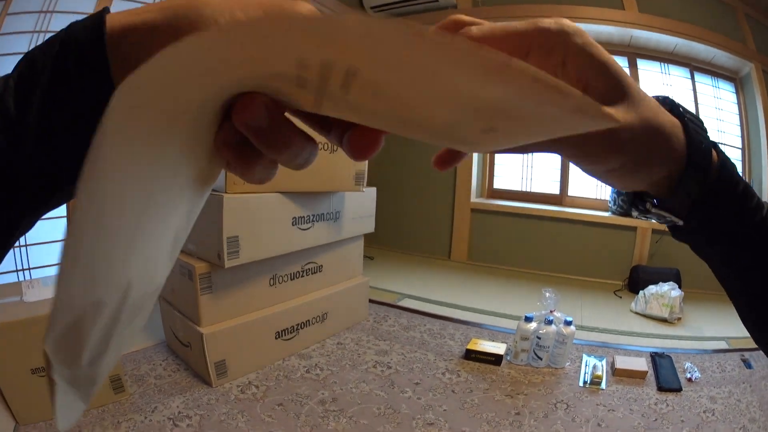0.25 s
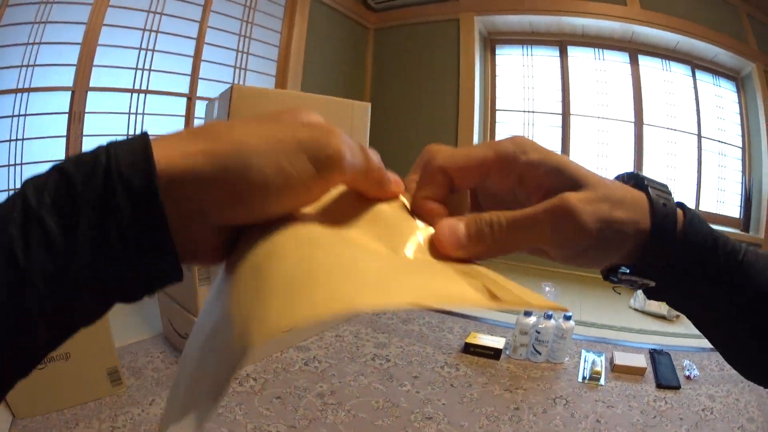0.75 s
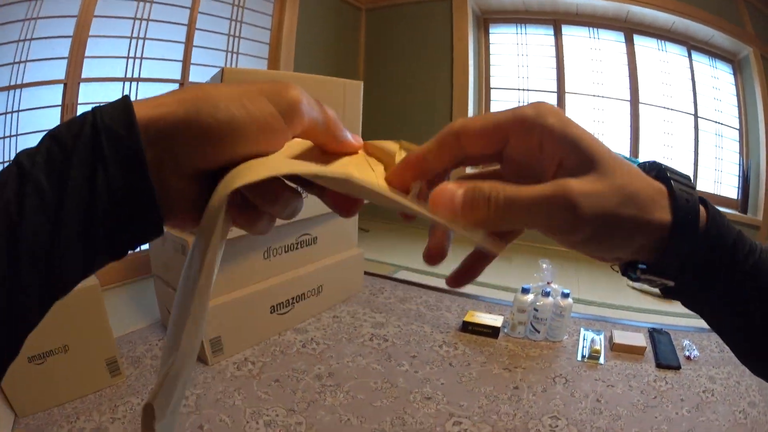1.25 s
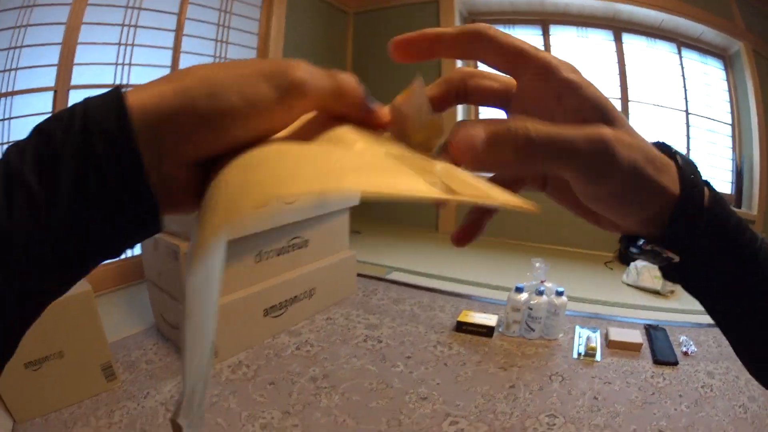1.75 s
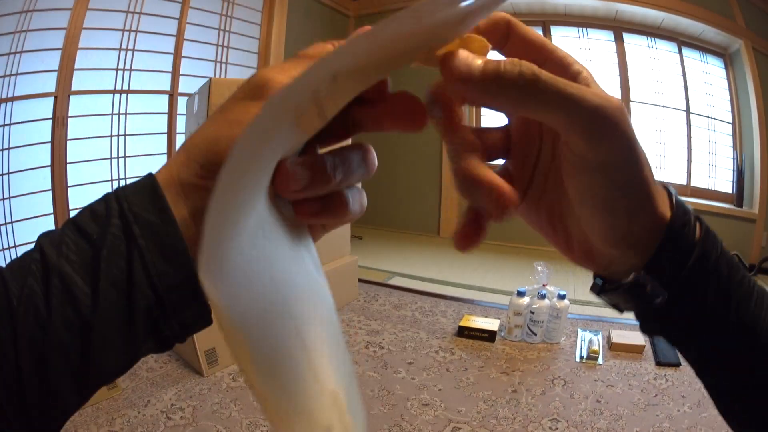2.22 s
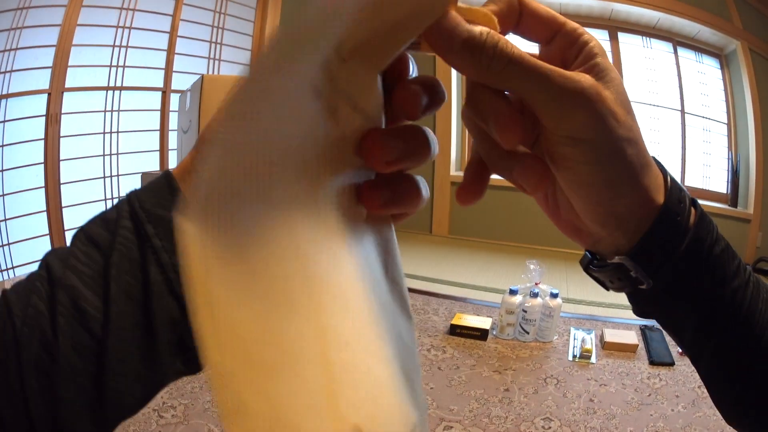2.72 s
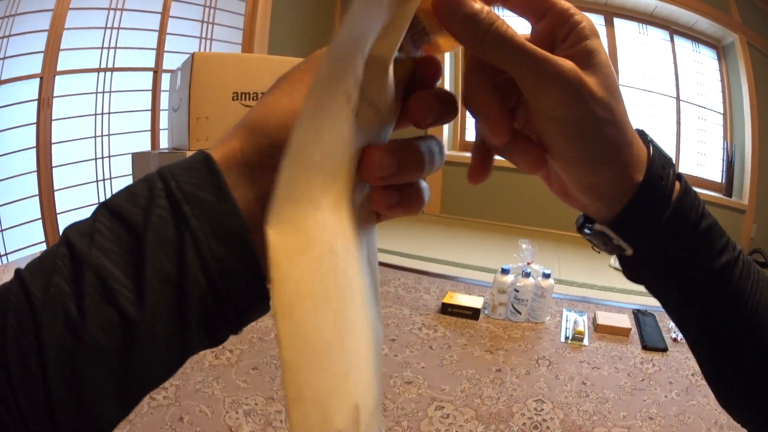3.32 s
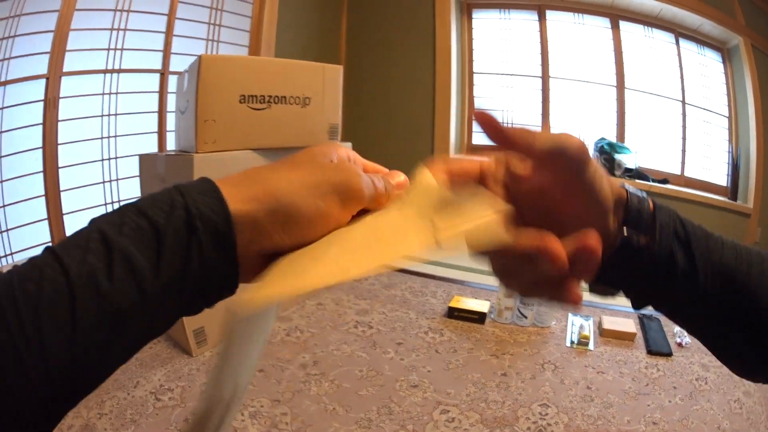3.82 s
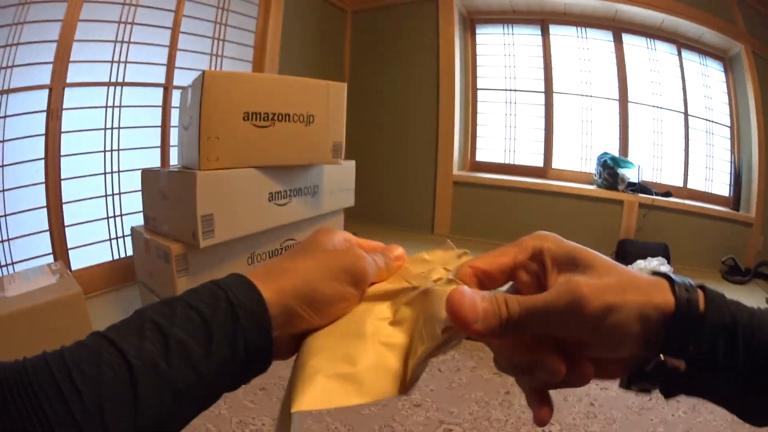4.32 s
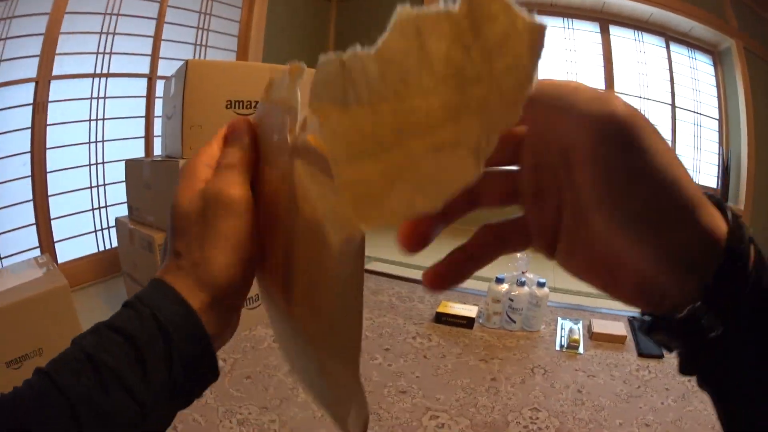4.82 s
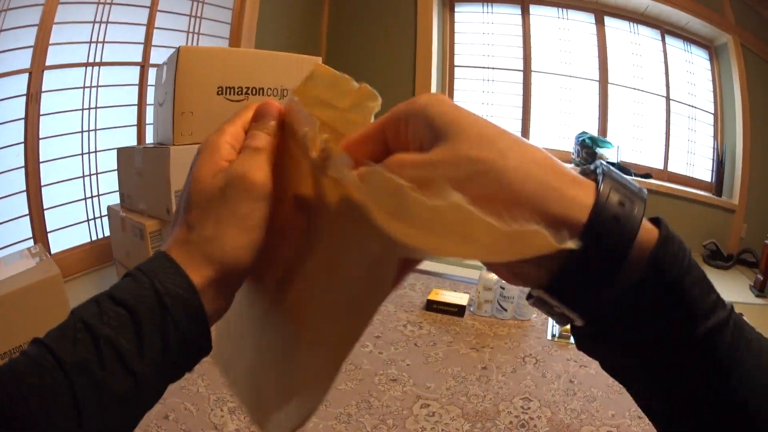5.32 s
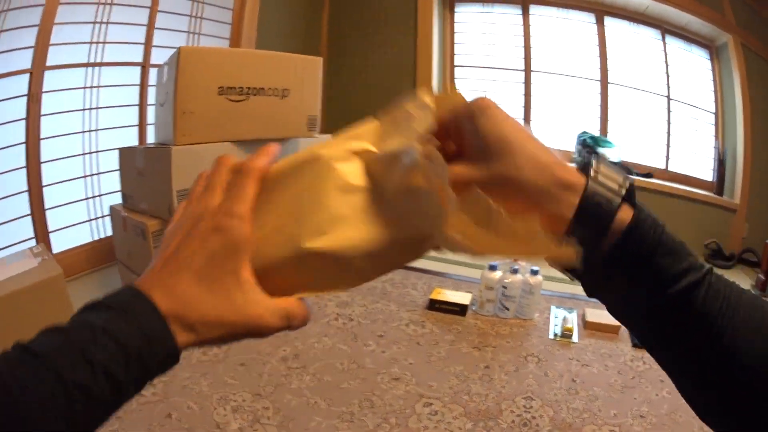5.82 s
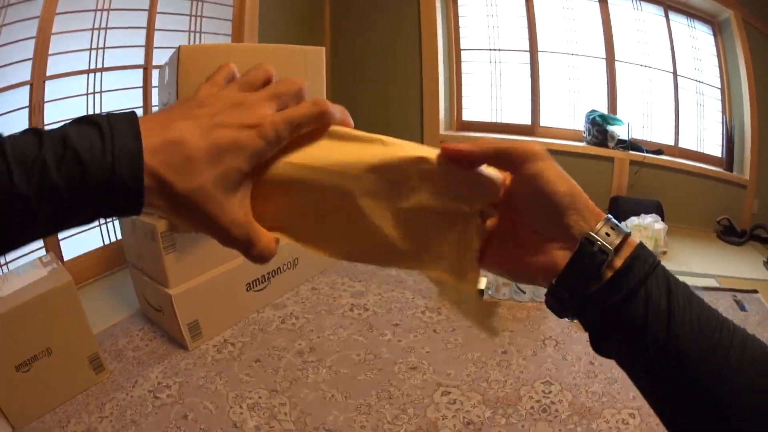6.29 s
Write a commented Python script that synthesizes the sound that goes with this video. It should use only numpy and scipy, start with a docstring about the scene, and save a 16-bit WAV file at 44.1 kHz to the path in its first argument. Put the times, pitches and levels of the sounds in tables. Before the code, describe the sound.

A stiff paper mailer is picked at, torn and crumpled close by, with sharp snaps, dry crackle and hollow rustling in a quiet room.

```python
"""Sharp snaps and a burst of crackle, then a kraft paper mailer picked at, torn open and crumpled close by.
Buckling creases are short noise bursts through resonances; crackle and knocks are random trains of wavelets.
Rubbing is patchy filtered noise, thuds are dying low sines; the hollow pouch rings as a set of resonances.
Hand strokes set the levels. A small quiet room adds a short tail and a hush, the moving sheet a deep rumble."""
import sys
import numpy as np
from scipy import signal
from scipy.fft import rfft, irfft
from scipy.io import wavfile
from scipy.ndimage import uniform_filter1d, map_coordinates

SR = 44100
rng = np.random.default_rng(int(sys.argv[2]) if len(sys.argv) > 2 else 0)


def voltage_ratio(level):
    """Linear amplitude factor for a level in decibels (scalar or array-like)."""
    return 10 ** (np.asarray(level, float) / 20)


def transcribe(u):
    """Save the signal u as a 16-bit wav file named by the first command-line argument.

    u: samples, shape (n,) or (channels, n), limited to [-1, 1]; the rate is SR.
    q: integer samples, one column per channel.
    """
    v = np.clip(np.atleast_2d(u).T, -1, 1)
    q = np.round(v * 32767).astype(np.int16)
    wavfile.write(sys.argv[1], SR, q)


N = 288855  # samples

# Quiet room, relative spectrum: (frequency [Hz], density [dB per Hz])
AIR_SPECTRUM = [(15, -62), (25, -32), (412, 11), (798, 24), (1630, 5), (4510, -5), (6960, 10), (11000, -2),
                (14300, -70)]
# Decay of the room: (frequency [Hz], t60 [s])
ROOM_T60 = [(200, 0.12), (1000, 0.33), (4000, 0.13), (10000, 0.12)]
# Phase lead of the left microphone port over the right: (frequency [Hz], lead [rad])
PORT_LEAD = [(0, 0.019), (1030, 0.49), (5940, 0.38), (11900, -0.89)]
# Left port level over right: (frequency [Hz], difference [dB])
PORT_BALANCE = [(60, -3), (170, -3.5), (490, -3.5), (1420, -0.5), (4080, 2), (11700, 1)]
# Flexing sheet, relative spectrum: (frequency [Hz], density [dB per Hz])
FLEX_SPECTRUM = [(24, -42), (40, -33), (151, -36), (305, 0), (556, 7), (740, -17.5), (900, -0.5),
                 (1170, 13.5), (1980, -120)]
# Rubbing paper, relative spectrum: (frequency [Hz], density [dB per Hz])
PAPER_SPECTRUM = [(410, -11.5), (700, -6.5), (1520, -2.5), (1840, -2), (4230, 0), (7700, -9.5), (9040, -19),
                  (11000, -14), (14300, -67)]
# Whole sheet pops in or out: (time [s], level [dB re amplitude 2], frequency [Hz])
THUDS = [(0.176, -34, 240), (0.667, -42, 150), (1.511, -43, 85), (2.0, -28, 230), (2.727, -35, 380),
         (3.986, -25.5, 470), (4.352, -22.5, 330), (4.412, -17.5, 490), (4.911, -32, 320),
         (5.424, -33, 170), (6.216, -27.5, 422), (6.306, -41, 60)]
# Walls of the mailer, drumming at any grip: (frequency [Hz], width [Hz], gain [dB])
WALL_MODE = (355, 238, 8.8)
# Air in the mailer, before hollowness is added: (frequency [Hz], width [Hz], gain [dB])
AIR_MODES = [(1450, 380, -0.8), (2860, 275, -9.5), (4240, 530, -6.5), (7410, 930, 1.5)]
# State of the mailer: (time [s], grain of the rustle [0-1], hollowness [dB],
# crumpling between strokes [dB], brightness of a stroke's peak [dB])
GRIP = [(0, 0.8, -8, -66, 2), (.9, 0.61, 4, -64, 1), (1.5, 0.7, 0, -51, -0.5),
        (2.25, 0.8, -3.5, -46.5, -2.5), (2.47, 0.61, -11, -51, -3), (3.03, 0.78, -1, -73, -2.5),
        (3.5, 0.64, 0.5, -79, -4.5), (4.3, 0.69, 2, -47, 2.5), (4.45, 0.9, 5, -50, -4),
        (4.52, 0.27, -1, -66, -7.5), (4.85, 0, -5, -45, -3), (4.92, 0.62, 5.5, -60, 0),
        (5.45, 0.74, -1.5, -41, -1), (5.75, 0.5, 1.5, -61, -4.5), (6.55, 0.75, 5, -59, -12.5)]
# Pulls and squeezes of the hands: (peak time [s], crumpling [dB], rise over 20 dB [ms],
# fall over 20 dB [ms], flap of the whole sheet [dB])
STROKES = [(0.012, -25.5, 51, 155, -37), (0.179, -36.5, 79, 148, -38.5), (0.367, -39, 350, 204, -43),
           (0.497, -34, 26, 151, -44), (0.671, -38.5, 71, 250, -37), (0.743, -35, 195, 163, -50),
           (0.874, -31, 12, 200, -56), (0.899, -23.5, 25, 70, -42), (0.989, -21.5, 18, 71, -53),
           (1.071, -34.5, 118, 139, -34.5), (1.173, -39.5, 57, 800, -48), (1.434, -20, 16, 14, -60),
           (1.467, -20, 65, 71, -37), (1.503, -25, 22, 50, -44), (1.648, -34, 105, 140, -31.5),
           (1.821, -29, 134, 37, -40), (2.014, -12.5, 17.5, 15, -26.5), (2.04, -35, 152, 190, -51),
           (2.175, -33.5, 143, 10, -44), (2.215, -37, 13, 120, -52), (2.298, -37, 11, 104, -58),
           (2.384, -40, 150, 120, -43), (2.584, -37, 50, 95, -61), (2.697, -43, 17, 200, -58),
           (2.829, -35, 243, 32, -38), (2.862, -32, 8, 98, -54), (3.069, -39, 4, 135, -53),
           (3.125, -38.5, 136, 25, -56), (3.207, -35.5, 29, 125, -63), (3.325, -30, 90, 35, -37.5),
           (3.492, -27, 0, 155, -61), (3.553, -26, 114, 25, -33), (3.6, -38, 69, 403, -61),
           (3.79, -39.5, 664, 100, -44), (3.818, -37, 19, 300, -57), (3.876, -24, 164, 77, -39),
           (3.93, -25, 120, 36, -39), (3.993, -29, 68, 175, -29), (4.122, -20, 29, 117, -26),
           (4.275, -24, 34, 39, -41), (4.35, -20.5, 31, 294, -37), (4.446, -18, 113, 201, -25.5),
           (4.912, -36, 2, 195, -45), (4.937, -37, 32, 141, -36.5), (5.011, -39.5, 47, 200, -39),
           (5.162, -32, 180, 105, -38.5), (5.277, -32, 32, 200, -38.5), (5.37, -27.5, 82, 198, -29.5),
           (5.429, -33.5, 120, 99, -28.5), (5.51, -32, 25, 246, -34), (5.588, -40, 150, 150, -30),
           (5.685, -30.5, 48, 55, -42), (5.766, -19.5, 49, 168, -24.5), (5.94, -23.5, 116, 120, -26.5),
           (5.998, -25.5, 90, 129, -33), (6.066, -29.5, 54, 87, -35), (6.194, -32.5, 53, 500, -38),
           (6.311, -22, 29, 200, -38), (6.345, -19, 57, 155, -44), (6.44, -23, 69, 200, -36),
           (6.515, -25, 120, 150, -32.5)]
# Creases that buckle: (time [s], level [dB], centre [Hz], length [ms])
SNAPS = [(0.025, -14.5, 4400, 1.3), (0.045, -20, 4300, 6.3), (0.0583, -20.5, 4020, 1.3),
         (0.0694, -27, 3950, 5.8), (0.172, -18, 4500, 1.26), (0.218, -32, 5570, 0.76),
         (0.245, -24, 6200, 1.2), (0.2994, -14, 5000, 1.2), (0.336, -28, 5410, 1.1),
         (0.3649, -24, 2820, 1.7), (0.499, -30, 5260, 1.7), (0.5945, -36.5, 2960, 2.9),
         (0.6668, -13.5, 3430, 0.26), (0.745, -23.5, 3600, 1.6), (0.7675, -27, 6400, 1.7),
         (0.834, -32.5, 4450, 0.91), (0.8928, -18.5, 3300, 1.9), (0.9072, -18.5, 4170, 1.4),
         (1.0674, -13, 3300, 0.47), (1.088, -28, 3500, 1.2), (1.1045, -25, 3820, 0.85),
         (1.3178, -21, 4700, 0.53), (1.3258, -30, 5130, 0.7), (1.379, -32.5, 2050, 2.7),
         (1.4295, -22, 1250, 3), (1.4335, -20, 1300, 2), (1.4375, -18, 4000, 2), (1.4522, -17, 3200, 1.2),
         (1.5159, -21, 2050, 0.81), (1.6106, -27.5, 3400, 1.2), (1.617, -32, 4500, 1.5),
         (1.6309, -30.5, 4670, 3), (1.6415, -23, 7700, 4), (1.6495, -15, 3880, 1.6),
         (1.7096, -19, 1500, 0.8), (1.7919, -31, 1120, 5), (1.851, -32, 2690, 2.9),
         (1.9381, -15.5, 4200, 1), (1.9758, -14, 2220, 0.18), (1.9964, -18, 4920, 0.98),
         (2.0015, -15, 2700, 0.44), (2.0047, -19, 2530, 2.8), (2.092, -17, 3120, 0.67),
         (2.2091, -22, 2670, 1.7), (2.384, -25, 2820, 2.1), (2.4584, -37.5, 4250, 0.89),
         (2.5717, -35, 2830, 0.9), (2.6134, -31, 1930, 2), (2.696, -32, 2600, 1), (2.738, -33.5, 3050, 1.4),
         (2.9288, -23, 2830, 0.36), (2.944, -26.5, 3020, 1.16), (3.071, -34, 1460, 2.4),
         (3.0822, -32, 1900, 3.2), (3.179, -39.5, 2980, 1.4), (3.238, -39, 3000, 0.8),
         (3.3186, -33, 2630, 8.8), (3.3645, -29.5, 3200, 1.9), (3.4896, -30.5, 3400, 2.5),
         (3.499, -23, 1130, 1.8), (3.595, -29.5, 4360, 1.2), (3.646, -27, 2400, 0.65),
         (3.797, -32, 3830, 0.79), (3.814, -20.5, 1670, 2.2), (3.8287, -23, 4080, 1.2),
         (3.8655, -27, 6560, 3), (3.8772, -15.5, 3570, 1.6), (3.8874, -16.5, 3000, 1.4),
         (3.9225, -28, 4870, 3), (3.939, -17, 2300, 5.2), (3.977, -30, 4130, 0.8), (3.9881, -29, 1710, 1.8),
         (4.0487, -15, 3600, 1.04), (4.1076, -24, 4550, 3.9), (4.119, -16, 3900, 2.6),
         (4.132, -20, 3000, 1.5), (4.139, -11, 3560, 1.24), (4.145, -19, 2780, 3),
         (4.269, -22.5, 6260, 0.92), (4.2755, -22.5, 5300, 0.68), (4.292, -28, 4300, 1.9),
         (4.3292, -24, 5000, 0.7), (4.338, -21.5, 4300, 3.4), (4.3516, -17.5, 3130, 1.9),
         (4.36, -17, 3020, 0.84), (4.373, -23, 5800, 2.9), (4.3786, -14, 3840, 0.89),
         (4.3843, -19, 5260, 4.3), (4.3922, -21, 5170, 6), (4.4078, -15.5, 3730, 2.3),
         (4.413, -12, 3440, 0.3), (4.428, -17, 3930, 0.99), (4.4355, -16, 3450, 0.73),
         (4.441, -22, 3040, 4.1), (4.491, -23, 5000, 1.4), (4.7022, -31, 2580, 4.8),
         (4.771, -17, 4700, 1.3), (4.8123, -26.5, 3500, 1.2), (5.0081, -17.5, 2460, 0.86),
         (5.02, -27, 1800, 1.3), (5.0435, -24, 2120, 2.9), (5.07, -20.5, 2900, 1.3),
         (5.155, -24.5, 4830, 1.8), (5.236, -34, 2630, 2.4), (5.336, -29, 1500, 1), (5.367, -24, 1200, 2.8),
         (5.3767, -23.5, 1570, 1.3), (5.3825, -17.5, 1290, 0.43), (5.4247, -12, 1910, 0.47),
         (5.4321, -12.5, 2820, 2), (5.44, -21, 2960, 1.6), (5.4475, -24, 2300, 2),
         (5.506, -22.5, 3150, 2.3), (5.5195, -20, 3600, 1.6), (5.5734, -22, 2600, 1.9),
         (5.5886, -18.5, 1970, 1.3), (5.6168, -19.5, 3000, 2), (5.7233, -21, 2060, 1.9),
         (5.734, -20, 3660, 2.8), (5.7438, -18, 3600, 1.5), (5.7663, -18, 2620, 3.7),
         (5.773, -17, 1560, 3.3), (5.7802, -17.5, 2600, 1.3), (5.793, -18, 3170, 2.1),
         (5.8027, -19, 1620, 1.4), (5.82, -15, 3330, 0.9), (5.991, -27.5, 1500, 5.4),
         (6.006, -26, 6900, 3.5), (6.016, -18, 3600, 1), (6.066, -25.5, 2420, 2.4), (6.089, -34, 1440, 1.8),
         (6.1889, -25, 2350, 2), (6.1936, -19, 3000, 0.84), (6.2182, -23, 1550, 0.58),
         (6.2443, -13, 3700, 1.25), (6.299, -16.5, 2500, 0.91), (6.3109, -13.5, 4470, 0.49),
         (6.316, -19.5, 2940, 5.2), (6.33, -22, 1500, 4.2), (6.343, -19.5, 2840, 6), (6.37, -19.5, 1450, 2),
         (6.377, -22, 2800, 1.8), (6.4277, -18, 3150, 2.5), (6.4371, -16, 1760, 1.5),
         (6.4542, -19, 3000, 6), (6.4827, -14.5, 2290, 1.5), (6.512, -23.5, 1320, 1.5),
         (6.5177, -16, 3670, 1)]


def evened(x):
    """Scales to rms 1."""
    return x / np.sqrt(np.mean(x ** 2) + 1e-20)


def read(points, hz):
    """Reads a spectrum on a log-frequency axis."""
    f, value = np.transpose(points)
    return np.interp(np.log(hz + 1), np.log(f + 1), value)


def shaped(x, spectrum):
    """Colours a sound by a spectrum, to rms 1."""
    hz = np.fft.rfftfreq(x.shape[-1], 1 / SR)
    return evened(irfft(rfft(x) * voltage_ratio(read(spectrum, hz)), x.shape[-1]))


def wander(seconds):
    """Slow chance of rms 1 that changes over the given time."""
    size = round(seconds * SR)
    return evened(uniform_filter1d(uniform_filter1d(rng.standard_normal(N), size), size))


def add(mix, s, sound):
    """Adds a sound at a time."""
    part = mix[round(s * SR):][:len(sound)]
    part += sound[:len(part)]


def resonate(x, hz, width_hz):
    """A resonance of gain 1 at its centre."""
    return signal.lfilter(*signal.iirpeak(min(hz, 15000), hz / width_hz, SR), x)


def moving_resonance(x, hz, width_hz):
    """A resonance of gain 1 that follows a moving centre: shift to 0 Hz, smooth, shift back."""
    turn = np.exp(2j * np.pi * np.cumsum(hz) / SR)
    r = np.exp(-np.pi * width_hz / SR)
    return 2 * (turn * signal.lfilter([1 - r], [1, -r], x / turn)).real


def grains(pitches_hz, per_s, decay_cycles, spread_db, spectrum):
    """Short dying wavelets, one random train for each pitch, a few large among many small."""
    for hz in pitches_hz:
        size = voltage_ratio(spread_db * np.minimum(rng.exponential(1, N), 2.5))
        size = size * (rng.random(N) < per_s / SR)
        cycles = np.arange(3000) * hz / SR
        grain = np.sin(2 * np.pi * cycles) * np.exp(-cycles / decay_cycles)
        grain *= voltage_ratio(read(spectrum, hz)) * np.sqrt(hz) / np.linalg.norm(grain)
        yield hz, signal.oaconvolve(size * rng.choice([-1, 1], N), grain)[:N]


def grip(column):
    """One slow state of the mailer, sample by sample."""
    table = np.array(GRIP)
    return np.interp(np.arange(N) / SR, table[:, 0], table[:, column])


def strokes_db(peak_db, rise_ms, fall_ms, idle_db):
    """Strokes that each rise to a peak and die away, summed in power over an idle level."""
    t = np.arange(0, N, 64) / SR
    late_ms = 1000 * (t[:, None] - np.array(STROKES)[:, 0])
    under_db = 20 * np.maximum(-late_ms / rise_ms, late_ms / fall_ms)
    power = (voltage_ratio(peak_db - under_db) ** 2).sum(1) + voltage_ratio(idle_db) ** 2
    return np.interp(np.arange(N) / SR, t, 10 * np.log10(power))


def crumpling_db(haste=1.0, idle_offset_db=0.0):
    """Crumpling by the hands; haste speeds up each rise and fall."""
    _, peak_db, rise_ms, fall_ms, _ = np.transpose(STROKES)
    return strokes_db(peak_db, rise_ms / haste, fall_ms / haste, grip(3)[::64] + idle_offset_db)


def flapping_db():
    """Flaps of the whole sheet, all of one shape, over a faint steady level."""
    return strokes_db(np.transpose(STROKES)[4], rise_ms=26, fall_ms=36, idle_db=-53.5)


def brightness_db():
    """Treble over body: the treble of a stroke rises and falls faster than its body."""
    return grip(4) + crumpling_db(haste=1.34, idle_offset_db=-1) - crumpling_db()


def hush():
    """The quiet room's own noise, nearly independent at the two ports."""
    noise = rng.standard_normal((2, N))
    return voltage_ratio(-63.5) * shaped(noise + 0.097 * noise[::-1], AIR_SPECTRUM)


def draughts():
    """Air stirred by the moving sheet puffs against each port on its own: a deep lumpy rumble."""
    lowpass = signal.butter(3, 40, fs=SR, output="sos")
    deep = signal.sosfilt(lowpass, rng.standard_normal((2, N)))
    return voltage_ratio(0.75 * flapping_db() - 23.0 + 4.0 * wander(0.02)) * evened(deep)


def room(x):
    """Sparse reflections of random sign, each band dying at its own speed."""
    at = np.arange(130, SR // 2, 20)
    shape = (2, len(at))
    taps = np.zeros((2, SR // 2 + 20))
    np.put_along_axis(taps, at + rng.integers(0, 20, shape), rng.choice([-1., 1.], shape), 1)
    hz, t, z = signal.stft(taps, SR, nperseg=256)
    decay_db = -60 * t / read(ROOM_T60, hz)[:, None]
    tail = signal.istft(z * voltage_ratio(decay_db), SR, nperseg=256)[1]
    tail = tail + 0.095 * tail[::-1]  # a little of each tail reaches the other port
    return signal.fftconvolve(x[None], tail / np.linalg.norm(tail[0]), axes=1)[:, :N]


def ports(x):
    """Two microphone ports: the left leads slightly except at the top, with less bass and more treble."""
    hz = np.fft.rfftfreq(N, 1 / SR)
    left = voltage_ratio(read(PORT_BALANCE, hz) / 2) * np.exp(0.5j * read(PORT_LEAD, hz))
    pair = irfft(rfft(x) * np.array([left, 1 / left]), N)
    # the sounding spot moves across the sheet: opposite time shifts at the ports
    shift_samples = 0.14 * wander(0.01)
    return np.array([map_coordinates(v, [np.arange(N) + sign * shift_samples], mode="nearest")
                     for v, sign in zip(pair, (1, -1))])


def thuds():
    """A panel pops through and rings for a few low cycles."""
    t, out = np.arange(8000) / SR, np.zeros(N)
    for s, db, hz in THUDS:
        cycles = t * hz
        envelope = 2 * voltage_ratio(db - 60 * cycles / 7.0) * np.minimum(cycles / 0.35, 1)
        add(out, s, envelope * np.sin(2 * np.pi * cycles))
    return out


def flexing():
    """The whole sheet bends and flaps: dull knocks over a low rustle that differs at each port."""
    trains = grains(np.geomspace(90, 950, 18), per_s=50, decay_cycles=1.8, spread_db=4.8,
                    spectrum=FLEX_SPECTRUM)
    knocks = evened(sum(train for _, train in trains))
    rustle = shaped(rng.standard_normal((2, N)), FLEX_SPECTRUM)
    return voltage_ratio(flapping_db() - 2.0) * (knocks + 0.48 * rustle)


def pouch(x):
    """The walls drum low; the air rings higher with hollowness, each ring drifting in pitch and level by chance."""
    air = np.zeros(N)
    for hz, width_hz, db in AIR_MODES:
        moving_hz = hz * np.exp(0.08 * wander(0.05))
        air += voltage_ratio(db + 1.8 * wander(0.04)) * moving_resonance(x, moving_hz, width_hz)
    wall_hz, wall_width_hz, wall_db = WALL_MODE
    return x + voltage_ratio(wall_db) * resonate(x, wall_hz, wall_width_hz) + voltage_ratio(grip(2)) * air  # hollowness sets the air's level


def rubbing():
    """Fingers and paper slide on paper: a hiss that stutters with the grain while its colour drifts."""
    noise = shaped(rng.standard_normal(N), PAPER_SPECTRUM)
    _, s, z = signal.stft(noise, SR, nperseg=256)
    patches = uniform_filter1d(rng.standard_normal(z.shape), 12, axis=0)  # across frequency
    patches = uniform_filter1d(patches, 9, axis=1)  # across time
    patches_db = 4.7 * evened(patches) * np.interp(s, *np.transpose(GRIP)[:2])
    hiss = evened(signal.istft(z * voltage_ratio(patches_db), nperseg=256)[1][:N])
    high = signal.sosfilt(signal.butter(2, 4500, "high", fs=SR, output="sos"), hiss)
    hiss = hiss + (voltage_ratio(brightness_db() + 7.5) - 1) * high
    slips, catches = wander(0.0015), wander(0.006)
    stutter_db = grip(1) * (3.5 * slips + 3.25 * catches)
    return voltage_ratio(crumpling_db() - 9.3 + stutter_db) * hiss


def crackle():
    """Small fibres and folds let go in clumps; brighter handling favours the high grains."""
    clumps = voltage_ratio(5.3 * np.clip(wander(0.0066), -3, 1.5))
    tilt_db_per_octave = 0.5 * (brightness_db() + 3)
    trains = grains(np.geomspace(900, 10500, 16), per_s=110, decay_cycles=4.3, spread_db=5.0,
                    spectrum=PAPER_SPECTRUM)
    out = sum(voltage_ratio(tilt_db_per_octave * np.log2(hz / 3500)) * train for hz, train in trains)
    return voltage_ratio(crumpling_db() - 7.3) * np.clip(grip(1), 0, 1.5) * evened(out * clumps)


def snaps():
    """A crease flips: a short burst rings the nearby panel; lower, larger folds add more of a dull thump."""
    t, out = np.arange(900) / SR, np.zeros(N)
    for s, db, hz, ms in SNAPS:
        noise = rng.standard_normal(900)
        along = 1000 * t / ms
        swell = np.minimum(along / (0.12 * ms + 0.08), 1)  # a slow fold swells first
        burst = noise * swell * np.exp(-1.6 * along ** 1.1)
        burst[4] += 2.1 / max(ms, 1) * np.sign(noise[0])  # a quick flip starts with one sharp step
        crack = resonate(resonate(burst, hz, 1.55 * hz), hz, 1.55 * hz)
        crack += 0.17 * np.sqrt(3000 / hz) * signal.lfilter([1, -0.6], 1, burst)
        crack += 1.6 * np.sqrt(ms) * resonate(burst, hz, 0.25 * hz)  # a slower fold lets its panel ring
        crack *= np.sqrt(ms * SR / 1000) / np.linalg.norm(crack)  # rms 1 over the snap's length
        thump_hz = 450 * np.exp(0.27 * rng.standard_normal())
        thump = np.sin(2 * np.pi * thump_hz * t) * voltage_ratio(-60 * t / 0.018)
        thump_db = -19.5 - 6.4 * np.log2(hz / 2500)
        add(out, s, voltage_ratio(db) * (crack + voltage_ratio(thump_db) * thump))
    return out


def scene():
    """Paper close by, its echo in the room, the room's own hush and the draughts."""
    paper = pouch(snaps() + crackle() + rubbing())
    at_ports = ports(paper + flexing() + thuds() + voltage_ratio(-15.0) * room(paper))
    return at_ports + hush() + draughts()


def low_pass(x):
    """Removes everything above the highest recorded frequency."""
    return signal.sosfilt(signal.butter(12, 12310, fs=SR, output="sos"), x)


def record(dry):
    """The microphones lose the deep bass; after a steep band limit the loudest snaps are rounded off."""
    thin = signal.sosfilt(signal.butter(2, 140, "high", fs=SR, output="sos"), dry)
    limited = signal.sosfilt(signal.cheby1(10, 0.8, 10960, fs=SR, output="sos"), thin)
    rounded = limited / (1 + (limited / 0.8) ** 6) ** (1 / 6)
    return low_pass(rounded)


dry = scene()
out = record(dry)
transcribe(out)
```